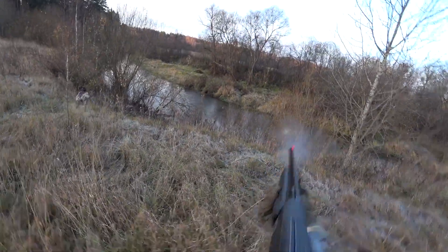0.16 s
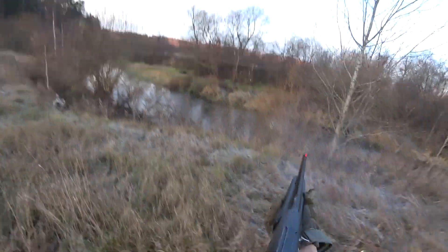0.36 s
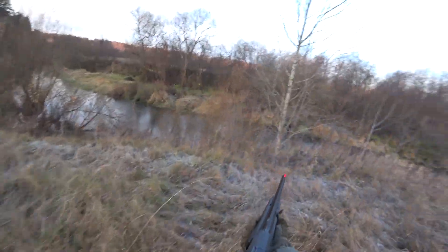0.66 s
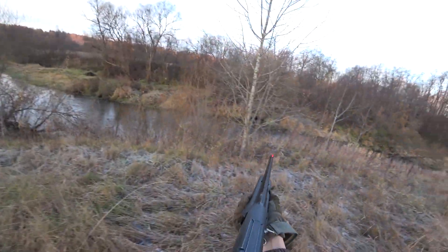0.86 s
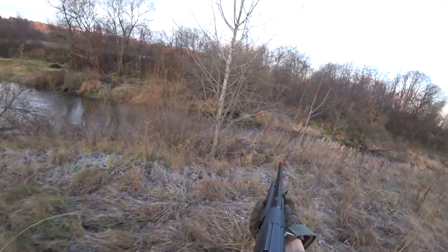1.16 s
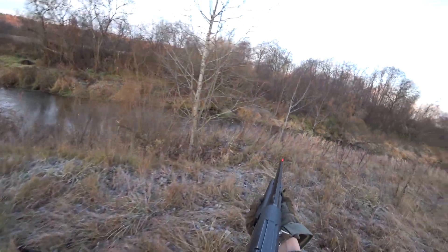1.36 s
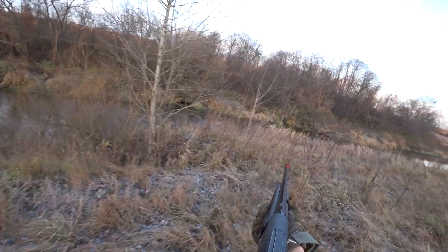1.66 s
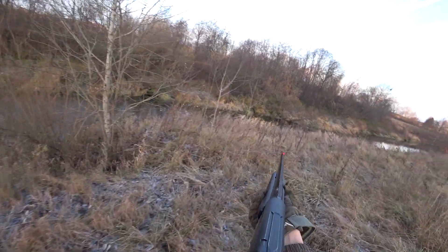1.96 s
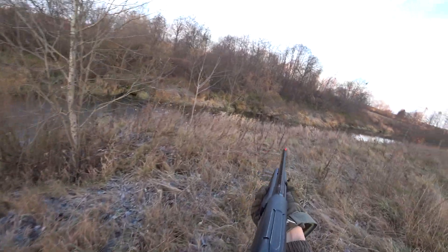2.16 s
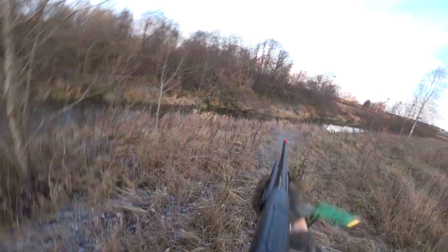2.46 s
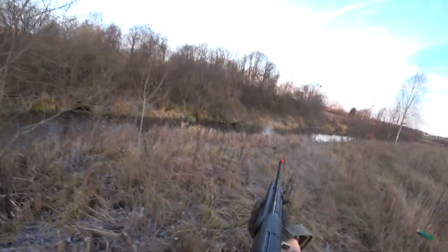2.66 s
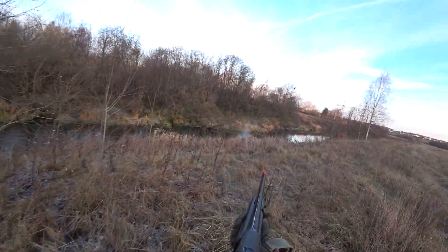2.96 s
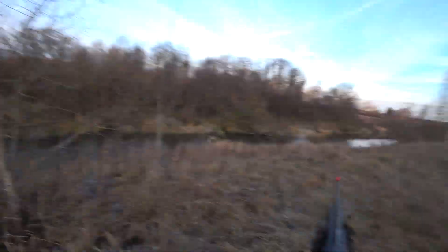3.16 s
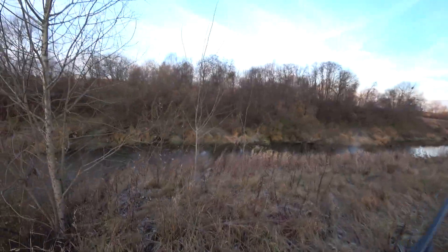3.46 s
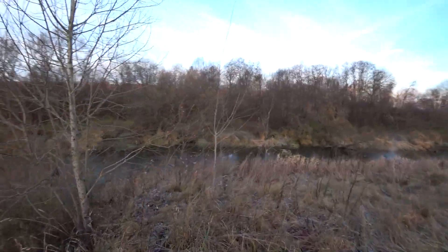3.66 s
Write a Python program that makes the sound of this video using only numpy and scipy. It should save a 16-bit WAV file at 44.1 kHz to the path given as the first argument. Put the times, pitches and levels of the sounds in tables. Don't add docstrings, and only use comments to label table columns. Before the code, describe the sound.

Two shotgun blasts by a river, each followed by clacking steel and lumpy woodland echoes.

```python
import sys
import numpy as np
from scipy import signal
from scipy.fft import rfft, irfft
from scipy.io import wavfile
from scipy.ndimage import uniform_filter1d

SR = 44100
rng = np.random.default_rng(int(sys.argv[2]) if len(sys.argv) > 2 else 0)


def dump_mix(stems):
    frames = np.atleast_2d(stems).T
    limited = np.clip(frames, -1, 1)
    pcm = np.round(limited * 32767).astype(np.int16)
    wavfile.write(sys.argv[1], SR, pcm)


def invert_db(x):
    u = np.asarray(x, float) / 20
    return 10 ** u


N = 167580
T = np.arange(N) / SR

# time in seconds, gas level in dB, low thump level in dB.
SHOTS = [
    (0.2153, -8, -7.5),
    (2.492, -8.5, -8.5),
]
# frequency in Hz, level in dB.
GAS_COLOUR = [(100, -14), (326, -5), (1120, -7.5), (1700, -5.5), (2310, -10.5), (7740, -8.5),
              (11000, -15.5)]
# time in seconds, level in dB, fall in seconds, lowest Hz, highest Hz.
CLACKS = [(0.251, -16, 0.0027, 2480, 7000), (0.2535, -23, 0.0016, 600, 9000),
          (.265, -16, 0.0039, 6000, 11500), (0.275, -17, 0.0041, 4070, 10100),
          (0.308, -10, 0.0016, 2100, 13000), (0.314, -19.5, 0.0022, 2100, 10000),
          (0.6444, -13, 0.00042, 2200, 8200), (0.656, -33, 0.0018, 3000, 7000),
          (0.7025, -26, 0.0024, 600, 5000), (0.729, -23.5, 0.0034, 700, 6040),
          (0.747, -20, 0.002, 3880, 13000), (.765, -17, 0.0024, 3300, 6500),
          (0.7866, -22, 0.0015, 4500, 10000), (0.7908, -19.5, 0.0068, 4000, 7150),
          (0.805, -32.5, 0.019, 2980, 7600), (2.556, -22, 0.0029, 4990, 11500),
          (2.562, -25, 0.017, 6000, 12000), (2.5916, -15.5, 0.0023, 1780, 7000),
          (2.598, -23, 0.0025, 1500, 6000), (2.603, -13, 0.0018, 3000, 11700),
          (2.607, -19.5, 0.004, 1780, 11500), (3.5867, -32, 0.004, 1600, 9000),
          (3.6138, -38.5, 0.0022, 3000, 9500)]
# time in seconds, level in dB, lowest Hz, highest Hz.
BUCKLE_TICKS = [(1.13, -32, 7000, 12000), (1.19, -34, 5000, 9000), (1.279, -39, 2500, 11000),
                (1.7171, -31.5, 1700, 7350), (1.96, -61, 4850, 10000), (2.086, -33, 2000, 11500),
                (2.267, -47, 1400, 3970), (2.406, -36.5, 1500, 6000), (2.451, -33, 1500, 5570),
                (2.462, -40, 2900, 5550), (3.41, -40, 4540, 9000)]
# frequency in Hz, level in dB.
STEEL_COLOUR = [(1000, -8.5), (2600, 3), (7300, 4), (11000, -2)]
# loudest moment in seconds,
# rise in seconds, fall in seconds, trunk boom level in dB, twig fizz level in dB.
TREE_ECHOES = [(0, .05, 0.58, -39, -52.5), (.332, 0.0047, 0.0067, -27.5, -23.5),
               (.362, 0.0047, 0.05, -18.5, -15.5), (.425, 0.016, 0.084, -21, -14.5),
               (.49, 0.024, 0.06, -17.5, -16), (.545, 0.052, 0.017, -19, -14.5),
               (.575, 0.011, 0.062, -23.5, -14), (.655, 0.021, 0.02, -19, -17.5),
               (.71, 0.015, 0.025, -22, -37), (.745, 0.016, 0.025, -16, -11),
               (.80, 0.016, 0.14, -24.5, -22.5), (.88, 0.0057, 0.023, -30, -22.5),
               (.912, 0.0015, 0.046, -23, -21), (.975, 0.039, 0.078, -23, -24),
               (1.1, 0.056, 0.13, -27, -26), (1.21, 0.038, 0.044, -29.5, -29.5),
               (1.35, 0.063, 1, -35, -29.5), (1.66, 0.027, 0.092, -43, -43),
               (2.645, 0.0038, 0.038, -27.5, -18.5), (2.677, 0.014, 0.038, -26, -12.5),
                 (2.73, 0.021, 0.052, -18, -16), (2.788, 0.048, 0.027, -21, -12),
                 (2.824, 0.02, 0.039, -18.5, -15), (2.86, 0.032, 0.026, -40, -15.5),
                 (2.918, 0.012, 0.017, -18.5, -15), (2.974, 0.032, 0.14, -33, -23.5),
                 (3.073, 0.0048, 0.0092, -33, -16.5), (3.11, 0.0013, 0.0033, -20.5, -12.5),
                 (3.184, 0.048, 0.085, -30, -22), (3.24, 0.049, 0.045, -28, -37),
                 (3.286, 0.036, 0.034, -22.5, -21.5), (3.329, 0.0057, 0.026, -23, -33),
                 (3.387, 0.026, 0.019, -28, -27.5), (3.451, 0.059, 0.095, -28.5, -28),
                 (3.529, 0.083, 0.055, -31.5, -27), (3.62, 0.039, 0.33, -35, -32)]
# frequency in Hz, level in dB.
BOOM_COLOUR = [(150, -3), (250, -4), (400, 4), (700, 5), (1600, -6)]
# frequency in Hz, level in dB.
FIZZ_COLOUR = [(400, -31.5), (900, -5), (1500, -3.5), (3000, -8), (5000, -8), (7500, -5.5), (9000, -11),
               (11500, -12)]
# frequency in Hz, left-right likeness from -1 to 1.
ECHO_LIKENESS = [(200, 1), (500, 0.89), (1420, 0.72), (11000, 0.76)]
# time in seconds, left over right in dB.
ECHO_PAN = [(0, 1.5), (.32, -1.5), (.85, 2.5), (.97, .5), (1.11, 3), (2.36, 1.5), (2.58, 1.5), (2.92, 0.4),
            (3.8, 1)]
# loudest moment in seconds, rise in seconds, fall in seconds,
# level in dB, pitch in Hz.
WATER_ROLLS = [
    (.66, 0.014, 0.07, -25.5, 326),
    (.72, 0.029, 0.055, -25, 222),
    (0.809, 0.034, 0.03, -22.5, 210),
    (1.598, .002, 0.0064, -18, 380),
    (2.548, 0.026, 0.026, -31.5, 204),
    (.36, 0.047, .12, -34, 123),
    (2.69, 0.042, 0.031, -30.5, 126),
]
# time in seconds, peak level in dB, pitch in Hz.
BIG_TRUNKS = [(0.359, -8, 465), (0.369, -9, 460), (0.414, -12, 625), (0.466, -6, 676), (0.49, -4.5, 456),
              (0.536, -4.5, 740), (0.562, -6.5, 705), (0.652, -11, 370), (0.703, -10, 380),
              (0.728, -7.5, 377), (0.877, -12, 630), (0.909, -8, 565), (0.939, -8.5, 514),
              (0.963, -10, 660), (0.979, -19, 516), (1.03, -16, 610), (1.096, -15.5, 486),
              (1.144, -23, 875), (1.176, -19.5, 509), (1.214, -19, 600), (2.795, -9, 410), (2.813, -6, 470),
              (2.821, -7.5, 425), (2.834, -12, 343), (2.913, -8, 630), (3.009, -21, 645), (3.145, -17, 369),
              (3.183, -16.5, 401), (3.209, -14, 400), (3.222, -10.5, 630), (3.242, -14, 446),
              (3.272, -12, 336), (3.286, -14, 556), (3.326, -12, 510), (3.344, -17, 483),
              (3.357, -17.5, 467), (3.384, -19, 646), (3.435, -15, 759), (3.449, -21.5, 616),
              (3.489, -15, 603), (3.508, -17.5, 368), (3.534, -16.5, 590)]
# start in seconds, length in seconds, level in dB.
SWISHES = [(-.2, 0.21, -46), (0.899, 0.28, -38.5), (1.158, 0.37, -46), (1.472, 0.15, -40.5), (.8, .12, -44),
           (3.115, 0.053, -46), (1.544, 0.75, -51.5), (1.94, 0.16, -41), (2.026, 0.19, -50.5),
           (2.205, .12, -61), (2.366, 0.25, -40), (3.0, 0.72, -52.5), (3.67, 0.16, -42)]
# frequency in Hz, level in dB.
CLOTH_COLOUR = [(1500, -8), (2400, -3.5), (4000, -3), (7000, -1.5), (11000, -9.5)]
# time in seconds, level in dB.
GUSTS = [(0, -45), (.52, -50), (.59, -36.5), (.79, -43), (.97, -27.5), (1.07, -41.5), (1.35, -26),
         (1.65, -31.5), (1.92, -25), (2.15, -34.5), (2.3, -27.5), (2.5, -33), (2.6, -59), (2.9, -43),
         (3.2, -38), (3.44, -51), (3.68, -43), (3.78, -35.5)]
# frequency in Hz, level in dB.
WIND_COLOUR = [(20, 0.5), (40, -2.5), (120, -7), (180, -15.5), (300, -23.5)]
# frequency in Hz, left-right likeness from -1 to 1.
WIND_LIKENESS = [(25, .96), (60, .8), (110, -.3), (160, -.9), (250, -.4)]
# frequency in Hz, level in dB.
FIELD_COLOUR = [(150, -7), (300, 0.5), (500, 2), (800, -34), (1200, -12), (2200, -29), (5000, -25.5),
                (11000, -19)]


def blasts():
    push_delay_s, swing_s = 0.0118, 0.0005
    gas = colour(pair(lambda: grains(14000, 4.0), ECHO_LIKENESS), GAS_COLOUR)
    gas_level, thump = 0, 0
    for s, gas_db, thump_db in SHOTS:
        suction = np.exp(-((T - s - push_delay_s) / swing_s - 2) ** 2)
        push = hump(s + push_delay_s, swing_s / 2, swing_s / 2)
        tear = (1 - 0.85 * np.sqrt(suction)) * hump(s + 0.0016, 0.0011 / 2, 0.026)
        hammer = invert_db(-4) * hump(s - 0.0025, 0.00051, 0.00064)
        gas_level = gas_level + invert_db(gas_db) * (tear + hammer)
        thump = thump + invert_db(thump_db) * (push - 0.8 * suction)
    return gas * gas_level + thump * panned(12.0)


def action():
    steel = colour(pair(lambda: grains(20000, 0.91), ECHO_LIKENESS), STEEL_COLOUR)
    out = steel * sum(invert_db(-19) * hump(s + 0.017, 0.0034, 0.069) for s, _, _ in SHOTS)
    buckles = [(s, db, 0.0016, low_hz, high_hz) for s, db, low_hz, high_hz in BUCKLE_TICKS]
    u = np.arange(1900) / SR
    for s, db, fall, low_hz, high_hz in CLACKS + buckles:
        here = slice(round(s * SR), round(s * SR) + len(u))
        tick = 5 * (u == 0) * np.sqrt(fall * 250)
        strike = steel[:, here] * np.exp(-u / fall) + tick
        band = signal.butter(2, [low_hz, high_hz], "band", fs=SR)
        out[:, here] += invert_db(db) * signal.lfilter(*band, strike) * 1.63
    return out * panned(-1.7)


def echoes():
    boom_power, fizz_power = 0, 0
    for s, rise, fall, boom_db, fizz_db in TREE_ECHOES:
        blur = 1 + since_shot(s)
        boom_power = boom_power + (invert_db(boom_db) * hump(s, rise, fall)) ** 2
        fizz_power = fizz_power + (invert_db(fizz_db) * hump(s, rise * blur, fall * blur)) ** 2
    boom = colour(pair(trunks, ECHO_LIKENESS), BOOM_COLOUR) * np.sqrt(boom_power)
    twigs = colour(pair(lambda: grains(6400, 0), ECHO_LIKENESS), FIZZ_COLOUR)
    fizz = air_darkened(twigs) * np.sqrt(fizz_power)
    mix = boom + fizz + water_rolls() + big_trunks()
    return mix * panned(np.interp(T, *np.transpose(ECHO_PAN)))


def trunks(count=12):
    cycles = 1.68
    hits = grains(900, 2.5)
    kind = rng.integers(0, count, N)
    out = np.zeros(N)
    for k, hz in enumerate(np.geomspace(262.4, 958, count)):
        u = np.arange(int(4 * cycles * SR / hz)) * hz / SR
        ring = hz * u * np.exp(-3 * u / cycles) * np.sin(2 * np.pi * u)
        out += signal.oaconvolve(hits * (kind == k), ring)[:N]
    return evened(out) + 0.69 * hiss()


def big_trunks():
    out = np.zeros(N)
    chances = rng.random((len(BIG_TRUNKS), 2))
    for (s, db, hz), (side, stretch) in zip(BIG_TRUNKS, chances):
        u = np.arange(int(12 * SR / hz)) * hz / SR
        v = 3 * u / (2.54 * (0.67 + 0.56 * stretch))
        ring = v * np.exp(1 - v) * np.sin(2 * np.pi * u * (1 - 0.011 * u))
        out[round(s * SR):][:len(u)] += np.sign(side - 0.5) * invert_db(db - 4.5) * ring
    return out


def water_rolls():
    out = 0
    for s, rise, fall, db, hz in WATER_ROLLS:
        tone = colour(hiss(), [(hz * 0.81, 0), (hz * 1.24, 0)], steep_db=-14)
        out = out + invert_db(db) * hump(s, rise, fall) * tone
    return out


def air_darkened(x):
    hz, t, z = signal.stft(x, SR, nperseg=512)
    loss_db = 3 * (hz[:, None] / 1000) ** 1.214 * since_shot(t)
    return signal.istft(z * invert_db(-loss_db), SR, nperseg=512)[1][:, :N]


def since_shot(t):
    first, second = SHOTS[0][0], SHOTS[1][0]
    return np.where(t > second, t - second, np.maximum(t - first, 0))


def jacket():
    level = 0
    for s, length, db in SWISHES:
        stroke = np.sin(np.pi * np.clip((T - s) / length, 0, 1)).clip(0) ** 0.68
        level = level + invert_db(db) * stroke
    cloth = colour(pair(lambda: grains(10000, 1.9), [(1000, 0.81), (9000, 0.77)]), CLOTH_COLOUR)
    return cloth * level * invert_db(0.97 * wander(0.0063))


def wind():
    lumps = pair(lambda: hiss() * invert_db(2.5 * wander(0.025)), WIND_LIKENESS)
    gust = invert_db(np.interp(T, *np.transpose(GUSTS)))
    return colour(lumps, WIND_COLOUR) * gust * panned(4) * after_shot_lift()


def field():
    swell = invert_db(-50.5 + 0.7 * wander(0.05))
    return colour(pair(hiss, [(300, 0.85), (9000, 0.55)]), FIELD_COLOUR) * swell * after_shot_lift()


def after_shot_lift():
    return invert_db(2 * sum(hump(s + 0.06, 0.0064, 0.073) for s, _, _ in SHOTS))


def hiss():
    return rng.standard_normal(N)


def grains(rate, spread_db):
    chance, size, side = rng.random((N, 3)).T
    size_db = spread_db * np.minimum(-np.log(size + 1e-9), 3.6)
    return (chance < rate / SR) * np.sign(side - 0.5) * invert_db(size_db)


def wander(seconds):
    n = max(round(seconds * SR), 2)
    return evened(uniform_filter1d(uniform_filter1d(hiss(), n), n))


def hump(s, rise, fall):
    return np.exp(np.where(T < s, (T - s) / rise, (s - T) / fall))


def evened(x):
    return x / np.sqrt(np.mean(x ** 2) + 1e-20)


def read(points, hz):
    f, value = np.transpose(points)
    return np.interp(np.log(hz + 1), np.log(f + 1), value)


def colour(x, points, steep_db=-18):
    hz = np.fft.rfftfreq(N, 1 / SR) + 1
    below = np.maximum(np.log2(points[0][0] / hz), 0)
    above = np.maximum(np.log2(hz / points[-1][0]), 0)
    return evened(irfft(rfft(x) * invert_db(read(points, hz) + steep_db * (below + above)), N))


def pair(draw, likeness):
    c = np.clip(read(likeness, np.fft.rfftfreq(N, 1 / SR)), -1, 1)
    left, other = draw(), draw()
    right = irfft(c * rfft(left) + np.sqrt(1 - c ** 2) * rfft(other), N)
    return np.array([left, right])


def panned(db):
    return invert_db(np.array([db / 2 + 0 * T, -db / 2 + 0 * T]))


def scene():
    return blasts() + action() + echoes() + jacket() + wind() + field()


def roll_off(x):
    return signal.sosfilt(signal.butter(12, 12340, fs=SR, output="sos"), x)


def record(dry):
    ceiling = 0.95
    held = ceiling * np.tanh(dry / ceiling)
    lowpass = signal.firwin(401, 11047, window=("kaiser", 7.5), fs=SR)
    mix = signal.oaconvolve(held, lowpass[None], "same")
    return roll_off(mix)


dry = scene()
out = record(dry)
dump_mix(out)
```